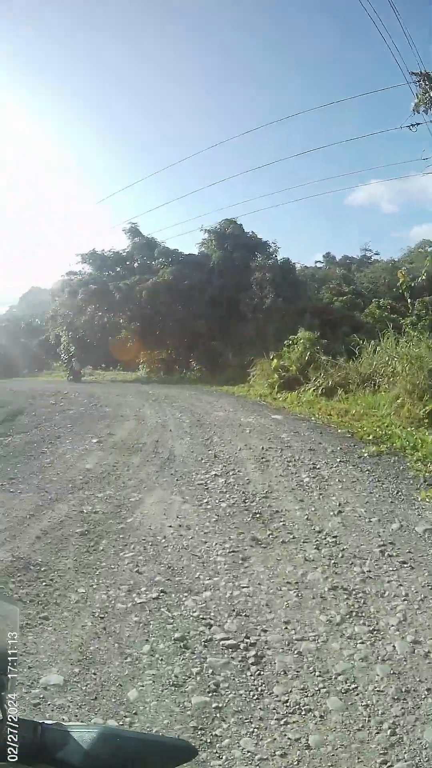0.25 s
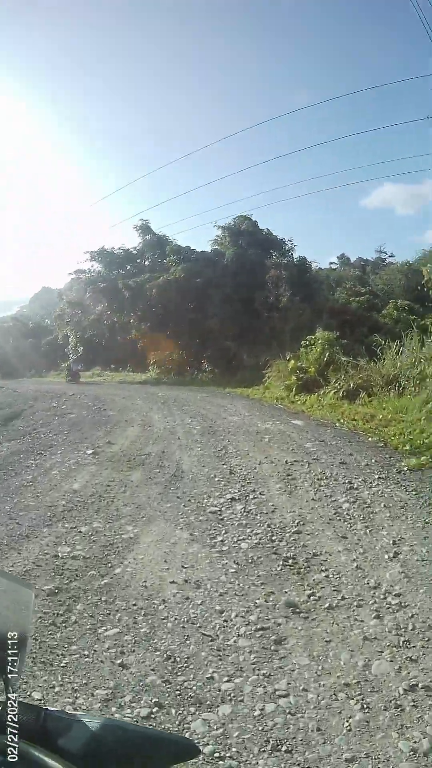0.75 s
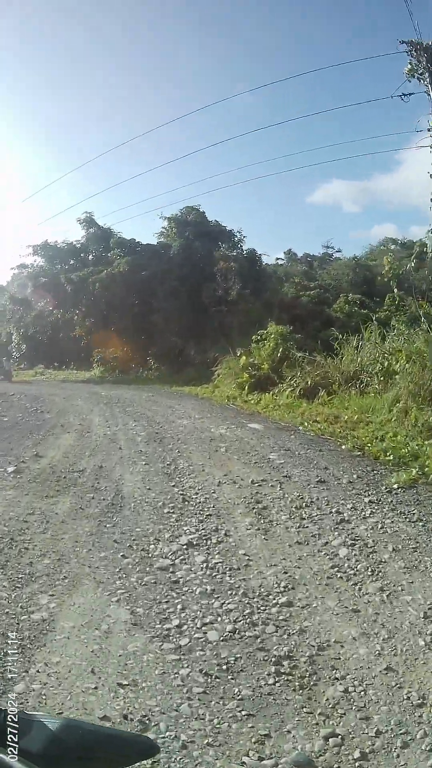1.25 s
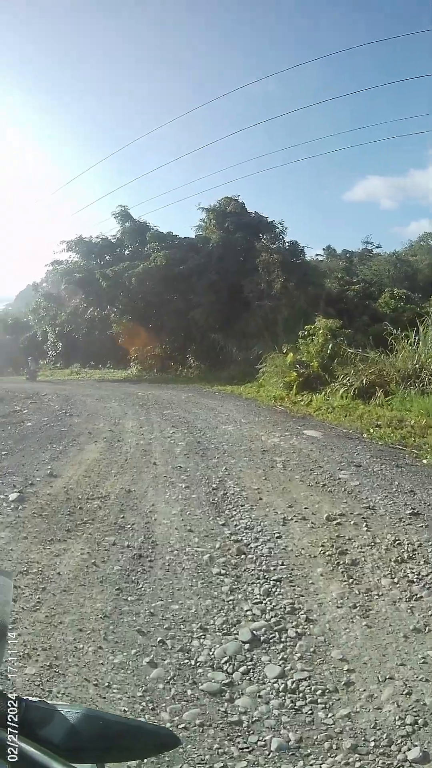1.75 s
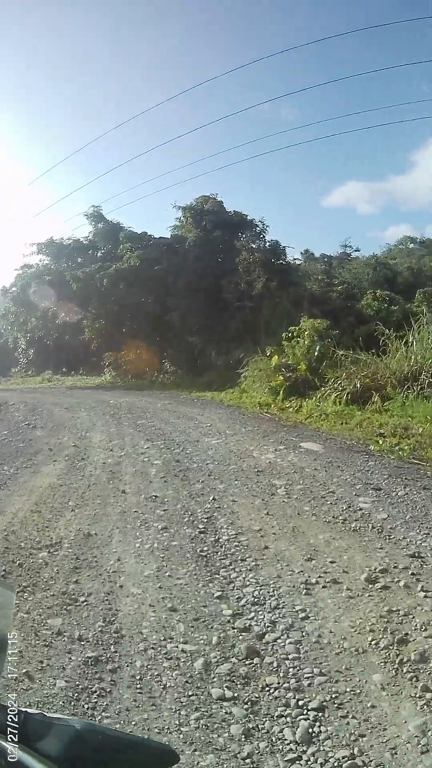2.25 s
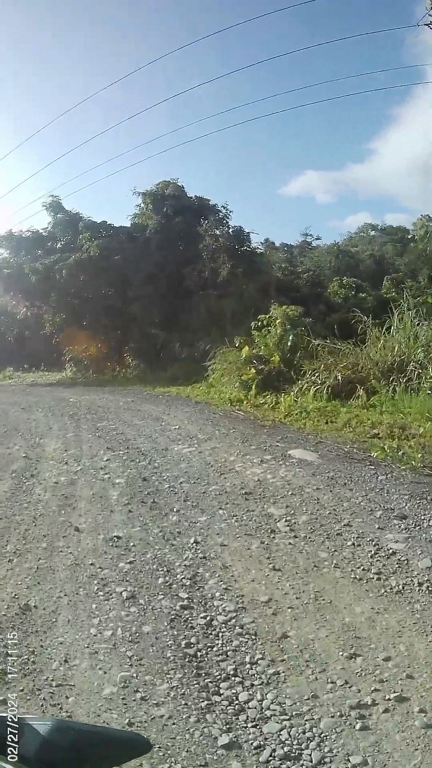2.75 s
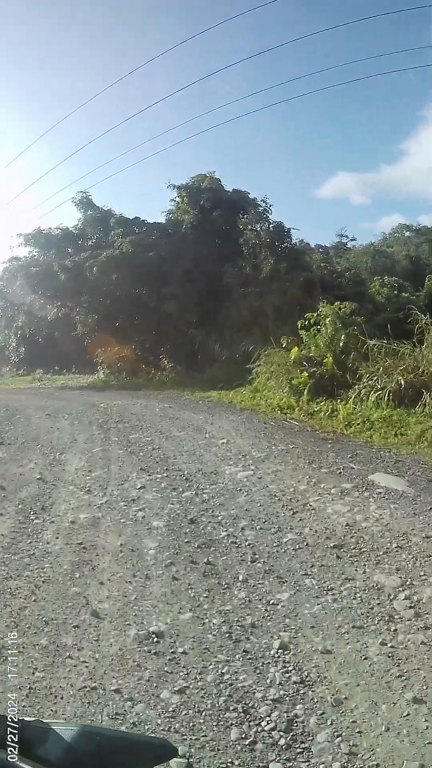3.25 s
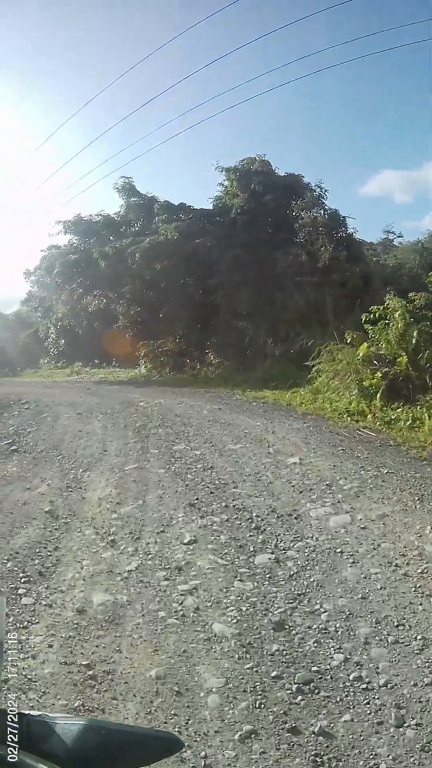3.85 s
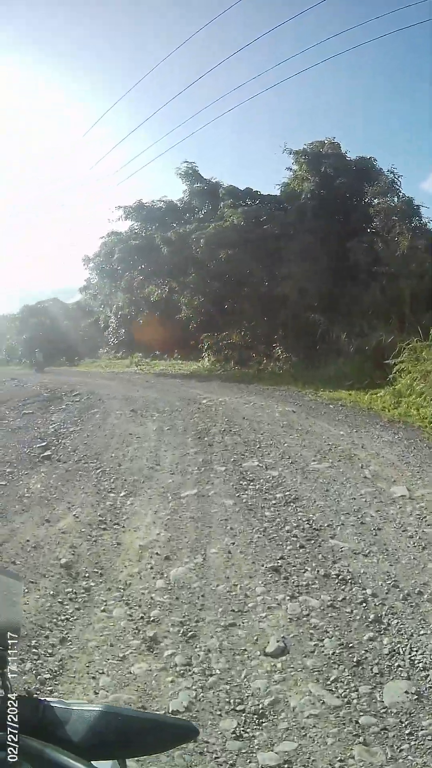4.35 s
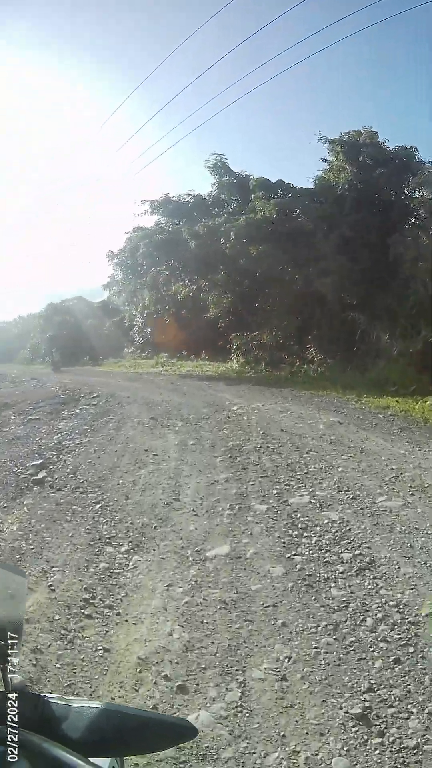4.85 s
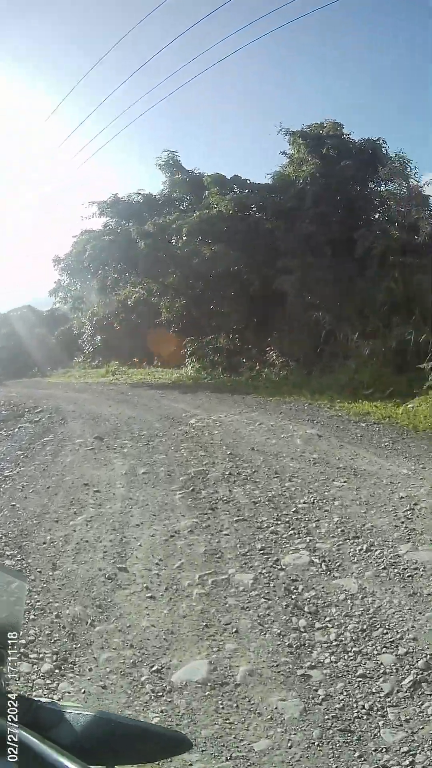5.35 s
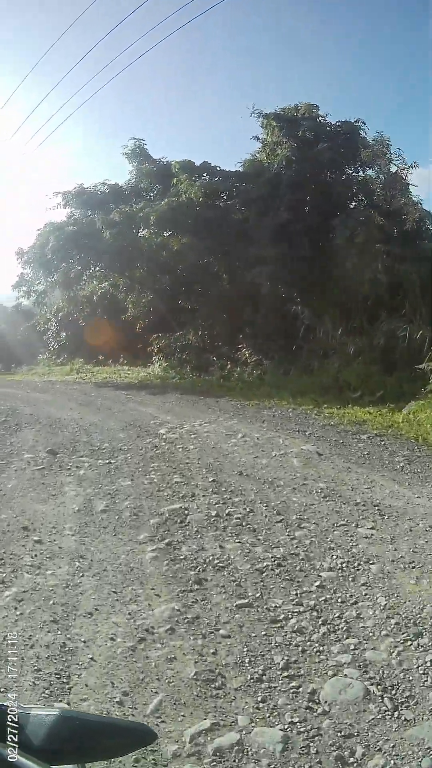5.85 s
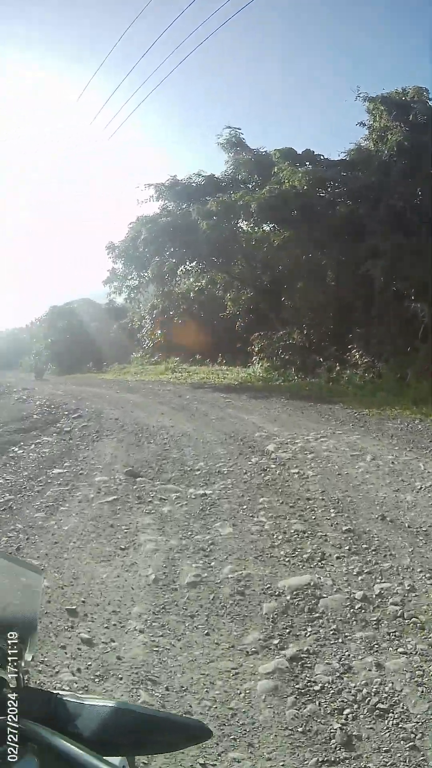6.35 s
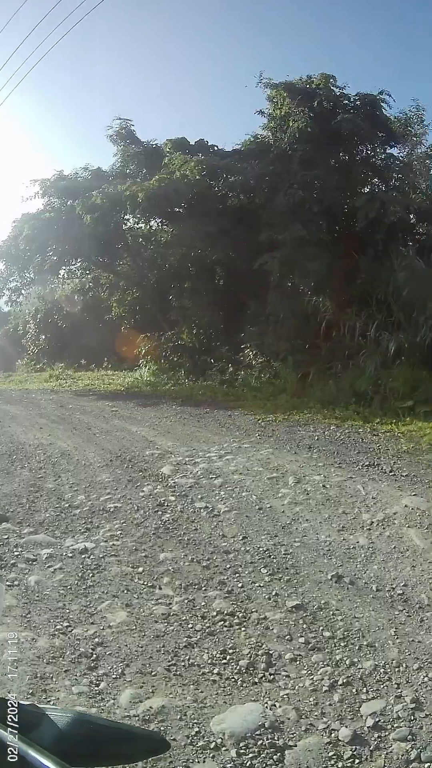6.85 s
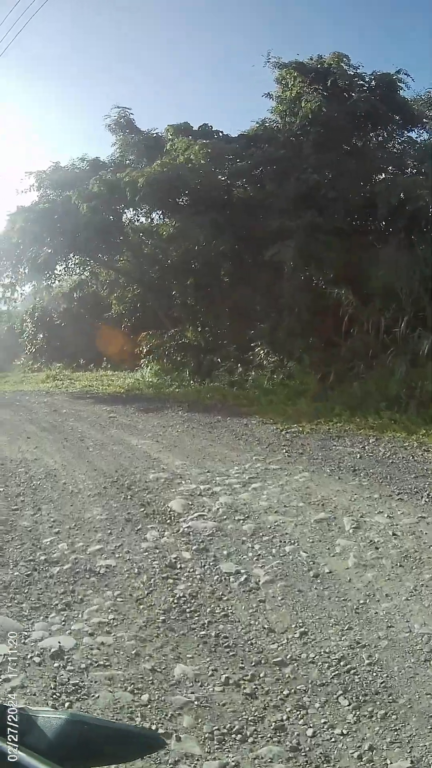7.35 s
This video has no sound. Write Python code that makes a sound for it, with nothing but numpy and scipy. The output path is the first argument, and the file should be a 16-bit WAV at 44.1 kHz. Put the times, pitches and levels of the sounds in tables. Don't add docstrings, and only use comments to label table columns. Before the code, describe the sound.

Continuous close motorcycle engine, deep and lumpy, lugging at a nearly steady low pace on loose stones outdoors. Its dry metallic rattle and valve chatter fill the midrange over tyre rumble. Stones knock dully on the frame, a loose plate clanks, a panel buzzes briefly near the start, and very faint high brake squeaks pass. The microphone is mounted on the bike, mono and dry, without audible surroundings.

```python
import sys
import numpy as np
from scipy import signal
from scipy.fft import rfft, irfft
from scipy.io import wavfile

SR = 44100
rng = np.random.default_rng(int(sys.argv[2]) if len(sys.argv) > 2 else 0)


def ratio_of_db(decibels):
    return 10 ** (np.asarray(decibels, float) / 20)


def int16_out(signal):
    q = np.round(np.clip(np.atleast_2d(signal).T, -1, 1) * 32767)
    wavfile.write(sys.argv[1], SR, q.astype(np.int16))


N = 336042

# time in seconds, cycle length in ms.
CYCLE_MS = [(0.0, 80.76), (0.18, 82.77), (0.54, 75.96), (1.22, 91.36), (1.42, 77.14), (1.66, 78.8),
            (2.22, 74.43), (3.26, 80.88), (3.82, 71.59), (4.14, 79.07), (4.7, 79.45), (4.86, 75.31),
            (5.94, 78.08), (6.26, 82.47), (6.98, 81.4), (7.14, 79.49), (7.3, 84.93), (7.62, 78.96)]
# start in seconds, front level in dB, rear level in dB.
FRONT_POOR = [(1.935, -29, -1.5), (2.242, -8.5, -1), (2.547, -32.5, -1.5), (3.014, -29.5, -2),
              (3.66, -8, -8.5), (3.81, -32, -6), (4.274, -30, -8), (4.436, -29, -5), (4.76, -30, -29.5),
              (4.916, -33, -33), (5.071, -28.5, -4.5), (5.225, -29.5, -4.5), (5.381, -4, -6),
              (6.176, -30, -6), (6.343, -29.5, -3.5), (6.925, -28.5, -5), (7.092, -30, -3.5)]
# start in seconds, front level in dB, rear level in dB, pop level in dB.
REAR_POOR = [
    (0.144, -0.5, -9.5, -6.5),
    (3.345, 1.1, -9, -10),
    (3.506, -0.2, -7, -21),
    (4.114, -1.5, -5, -12),
    (4.597, -2.4, -4.5, -11.5),
    (5.538, -1.1, -8.5, -9),
    (5.696, -5, -11, -6),
    (6.012, -8, -7.5, -12),
    (6.593, 0.5, -5, -7.5),
    (6.759, 0.5, -5.5, -9),
]
# start in seconds, front level in dB, rear level in dB.
SLOW_BURNS = [
    (0.23, -2, -5.5),
    (3.095, 1.3, -2),
    (3.261, 0.5, -4.5),
    (3.959, -0.5, -2),
    (5.853, -4, -6),
    (7.34, 1.5, -5.5),
]
# frequency in Hz, level in dB per Hz.
FRAME = [(230, -43), (390, -3.5), (520, -1), (615, -8), (700, -0.5), (900, -11), (1200, -16.5), (1420, -12),
         (1750, -25), (2500, -29.5), (3200, -37.5), (4000, -40.5), (5500, -45), (7000, -52.5),
         (11000, -67.5)]
# centre in Hz, width in Hz, height in dB above the frame's spectrum.
FRAME_PEAKS = [(535, 160, 3.87), (680.7, 45, 6.5), (1073, 59, 7.2), (1400, 87, 2), (2084, 250, 5.3),
               (2300, 93, -3), (2510, 88, 5.3), (2930, 250, 2.5), (3350, 180, -1.5), (3630, 130, 5.5),
               (3900, 180, -2.5), (4380, 400, 8), (5400, 250, 4)]
# start in seconds, peak level in dB, ring in Hz, upper ring in dB relative to the peak.
KNOCKS = [(1.207, -18.5, 706, -20), (1.474, -22, 716, -28.5), (1.577, -21, 546, -5), (1.684, -29, 690, -10),
          (3.489, -28, 670, -24), (3.719, -15.5, 648, -14), (3.793, -30, 700, -7), (3.892, -21.5, 700, -19),
          (3.941, -9.5, 706, -19), (4.115, -21.5, 712, -19), (4.297, -19.5, 485, -15),
          (4.54, -15.5, 780, -11.5), (5.004, -17, 715, -21), (5.089, -17.5, 690, -11),
          (5.182, -25, 669, -8), (5.211, -26.5, 580, -19), (5.255, -24, 493, -28), (5.349, -18, 503, -10),
          (5.603, -33, 753, 6), (5.762, -20.5, 542, -27), (6.182, -22, 740, -4), (6.242, -32, 703, -18),
          (6.409, -23.5, 740, -27), (6.648, -19.5, 677, -12), (6.681, -25, 523, -33),
          (6.906, -25, 635, -20), (6.939, -20, 667, -14), (7.326, -18, 535, -11.5), (7.451, -24, 583, -10),
          (7.572, -35, 600, -8)]
# start in seconds, peak level in dB, ring in Hz.
CLANKS = [(1.164, -27.5, 1290), (1.2882, -26, 1250), (2.3767, -31, 1255), (2.7734, -23, 1350),
          (2.993, -32.5, 1440), (3.2026, -26, 1250), (3.7232, -25, 1210), (3.9474, -27, 1287),
          (4.539, -18, 1410), (4.977, -25.5, 1270), (5.0876, -23.5, 1300), (5.352, -20, 1400),
          (6.1823, -23, 1455), (6.304, -26, 1400), (6.387, -24.5, 1385), (6.941, -23, 1250),
          (7.3134, -23, 1320), (7.4502, -20, 1400)]


def rms_one(x):
    return x / np.sqrt(np.mean(x ** 2) + 1e-20)


def clicks(times, sizes):
    train = np.full(N, 1e-18)
    np.add.at(train, np.clip(np.round(np.asarray(times) * SR).astype(int), 0, N - 1), sizes)
    return train


def ring(x, hz, t60):
    r, w = ratio_of_db(-60 / (t60 * SR)), 2 * np.pi * hz / SR
    return signal.lfilter([0, np.sin(w)], [1, -2 * r * np.cos(w), r * r], x)


def smooth(x, ms):
    r = np.exp(-1000 / (ms * SR))
    return signal.lfilter([1 - r], [1, -r], x)


def drift(rate_hz):
    ms = 1000 / (2 * np.pi * rate_hz)
    return rms_one(smooth(smooth(rng.standard_normal(N), ms), ms))


def bell(centre_s, width_s):
    return np.exp(-.5 * ((np.arange(N) / SR - centre_s) / width_s) ** 2)


def shaped_noise(times, size_db, swell_ms):
    swell = clicks(times, ratio_of_db(size_db))
    for _ in range(3):
        swell = smooth(swell, swell_ms)
    return swell * rng.standard_normal(N)


def band(x, low_hz, high_hz):
    return signal.sosfilt(signal.butter(2, [low_hz, high_hz], "band", fs=SR, output="sos"), x)


def colour(x, points, peaks=(), size=4096):
    hz = np.maximum(np.arange(size // 2 + 1) * SR / size, 1)
    points_hz, points_db = np.transpose(points)
    level_db = np.interp(np.log(hz), np.log(points_hz), points_db)
    for centre_hz, width_hz, peak_db in peaks:
        level_db = level_db + peak_db / (1 + (2 * (hz - centre_hz) / width_hz) ** 2)
    cepstrum = irfft(np.log(ratio_of_db(level_db)))
    cepstrum[1:size // 2] *= 2
    cepstrum[size // 2 + 1:] = 0
    return signal.fftconvolve(x, irfft(np.exp(rfft(cepstrum))))[:N]


def struck(s, peak_db, hz, t60, soft_ms):
    out, at, span = np.zeros(N), int(s * SR), np.arange(6000) / SR
    decay = ratio_of_db(peak_db - 60 * span / t60)
    onset = 1 - np.exp(-1000 * span / soft_ms)
    wave = decay * onset * np.sin(2 * np.pi * hz * span)
    out[at:at + len(span)] = wave[:N - at]
    return out


def cycles():
    poor = np.array([row[0] for row in FRONT_POOR + REAR_POOR + SLOW_BURNS])
    start, length = [-.0179], []
    while start[-1] < N / SR:
        slowed = np.min(np.abs(poor - start[-1])) < .03
        cycle_ms = np.interp(start[-1], *np.transpose(CYCLE_MS)) + 3.16 * slowed
        length.append(cycle_ms / 1000)
        start.append(start[-1] + length[-1])
    return np.array(start[:-1]), np.array(length)


def firings():
    # start in seconds, strength in dB, width in
    # ms.
    stray_pulses = [
        (0.0091, -4.0, 2.3),
        (0.3527, -13.5, 0.4),
        (1.2542, -11.7, 1.1),
        (3.5322, -10.9, 0.75),
        (4.7632, -10.3, 1.4),
        (4.7757, -10, 0.9),
        (4.782, -9, 0.9),
        (4.7882, -9, 0.9),
        (4.9313, -4.9, 1.8),
        (4.9524, -7.9, 1.4),
    ]
    # start in seconds, front level in dB, rear level in dB.
    soft_burns = [
        (0.0, 0.5, -0.5),
        (1.036, -2.5, 0.3),
        (1.302, -2, 0.1),
        (1.779, -2.5, 1),
        (2.393, -1.5, 0.5),
        (2.858, -3.5, 0.9),
        (4.996, 0, 1.5),
        (6.427, -1.5, -0.7),
        (6.51, -4, -1.3),
    ]
    front_s, length = cycles()
    rear_s = front_s + .243 * np.interp(front_s, *np.transpose(CYCLE_MS)) / 1000
    uneven_db = 0.5 * rng.standard_normal((len(length), 2))
    front_db = 0.56 - 0.17 * (1000 * length - 78) + uneven_db[:, 0]
    rear_db = 0.6 + uneven_db[:, 1]
    pop_ms = 0.93
    late = list(stray_pulses)
    for s, front, rear, *pop in FRONT_POOR + REAR_POOR + SLOW_BURNS:
        k = np.argmin(np.abs(front_s - s))
        front_db[k + 1] -= 0.9
        front_db[k], rear_db[k] = front, rear
        if pop:
            late.append((2 * rear_s[k] - front_s[k], pop[0], pop_ms))
        else:
            late.append((rear_s[k] + .0106, -16 + min(rear + 11, 0), .4))
    for s, front, rear in soft_burns:
        k = np.argmin(np.abs(front_s - s))
        front_db[k], rear_db[k] = front, rear
    front_ms = 0.85 + 0.5 * (front_db < -8)
    for s, *_ in SLOW_BURNS:
        k = np.argmin(np.abs(front_s - s))
        front_s[k], front_ms[k] = front_s[k] - .004, 2.2
        late.append((front_s[k] + .009, -10.0, pop_ms))
    rear_ms = np.clip(0.54 + 0.06 * rear_db, .4, 1)
    front_rows = np.c_[front_s, front_db, front_ms]
    other_rows = np.vstack([np.c_[rear_s, rear_db, rear_ms], late])
    return [rows[rows[:, 0] < N / SR] for rows in (front_rows, other_rows)]


def blasts(rows, size=0):
    s, strength_db, width_ms = np.transpose(rows)[:, :, None]
    at = np.round(s * SR).astype(int) + np.arange(-400, 401)
    from_centre = (at / SR - s) * 1000 / width_ms
    shape = ratio_of_db(strength_db) / width_ms * np.exp(-.5 * from_centre ** 2)
    lead = int(.3 * SR)
    out = np.zeros(N + 2 * lead)
    np.add.at(out, at + lead, shape)
    return out[lead - size:lead + N]


def exhaust():
    # start in seconds, strength in dB, width in ms.
    misfires = [
        (3.1291, -15.5, 0.4),
        (3.5466, -13.2, 1.1),
        (4.2747, -5.6, 2.3),
        (4.4366, -8.5, 1.8),
        (4.7997, -6.8, 2.3),
        (5.5484, -13.4, 0.75),
        (5.7067, -13.5, 0.75),
        (6.3759, -14.9, 0.4),
        (7.3731, -13.1, 0.4),
    ]
    # frequency in Hz, level in dB, t60 in seconds, sign.
    pipe_modes = [(73.1, -43.1, .231, -1), (131.1, -44.0, .064, 1), (165.0, -57.3, .117, 1),
                  (192.2, -48.5, .053, 1), (313.7, -47.5, .023, 1), (333.9, -48.7, .083, -1)]
    lead = int(.3 * SR / 2)
    front, rest = (blasts(rows, size=lead) for rows in firings())
    rest = rest - blasts(misfires, size=lead)
    pipe = 0
    for hz, level_db, t60, sign in pipe_modes:
        header_db = 6.5 * (hz > 300)
        pipe = pipe + sign * ratio_of_db(level_db) * ring(ratio_of_db(header_db) * front + rest, hz, t60)
    w, mic_q = 2 * np.pi * 39.3, .3
    return signal.lfilter(*signal.bilinear([1, 0, 0], [1, w / mic_q, w * w], SR), pipe)[lead:]


def rumble():
    # frequency in Hz, level in dB per Hz.
    road_spectrum = [(20, -17), (40, -17), (60, 1), (120, -9), (175, 11), (240, -19.5), (330, 2),
                     (420, -26.5), (600, -50.5), (1500, -110)]
    swell = rms_one(smooth(smooth(blasts(np.vstack(firings())), 9.5), 23.0))
    drone = rms_one(colour(rng.standard_normal(N), road_spectrum, size=16384))
    return ratio_of_db(-30.5) * (0.57 + 0.68 * swell) * drone


def at_share(share):
    start, length = cycles()
    return np.maximum(start + share * length, 0)


def valve_gear():
    # share of the cycle, low edge in Hz, high edge in Hz, level in dB over the whirr, swell in ms.
    puffs = [(.8, 1700, 3200, 8, 2.5), (.755, 1250, 1700, 7.5, 1.3), (0.071, 1700, 3000, 6.5, 3),
             (.12, 900, 1250, 10.5, 3.0), (.82, 900, 1100, 2.5, 6.7), (.33, 5200, 12000, 3, 1.9),
             (.575, 3000, 8800, 1, 2.4), (.84, 4400, 11000, 2.5, 3.0), (.035, 5000, 14000, 1.5, 2.5),
             (.43, 1250, 2250, 2.5, 2), (0.035, 1250, 1700, 4.5, 2.2), (.05, 2400, 4500, 1, 2.3),
             (1, 2250, 2900, 3, 0.83)]
    # share of the cycle, low edge in Hz, high edge in Hz, level in dB over the whirr.
    thumps = [(.03, 400, 620, 5.5), (.775, 420, 600, 5), (0.69, 600, 850, 5.5), (0.97, 600, 790, 2.2),
              (.345, 550, 850, 5), (0.014, 600, 850, 4), (.16, 600, 850, 3), (0.49, 600, 930, 3),
              (.78, 2350, 2600, 8.5), (.04, 2350, 2600, 11), (0.87, 2000, 2200, 6), (.04, 2000, 2200, 5)]
    out, uneven_db = 0, 1.5
    for share, low_hz, high_hz, db, swell_ms in puffs:
        s = at_share(share) - swell_ms / 500
        noise = shaped_noise(s, db + rng.normal(0, uneven_db, len(s)), swell_ms)
        out = out + band(swell_ms * SR / 270 * noise, low_hz, high_hz)
    for share, low_hz, high_hz, db in thumps:
        s = at_share(share)
        size = ratio_of_db(db + rng.normal(0, uneven_db, len(s))) * rng.choice([-1, 1], len(s))
        size = size * np.sqrt(SR / (high_hz - low_hz))
        out = out + band(clicks(s, size), low_hz, high_hz)
    return out


def gravel(per_s=260.0, spread_db=3.5, ring_cycles=28.0):
    sizes = ratio_of_db(spread_db * np.minimum(rng.exponential(1, N), 3)) * rng.choice([-1, 1], N)
    thrown = sizes * (rng.random(N) < per_s * ratio_of_db(3.0 * drift(8)) / SR)
    parts_hz, dealt = np.geomspace(480, 1600, 14), rng.integers(0, 14, N)
    out = 0
    for k, hz in enumerate(parts_hz):
        out = out + hz * ring(thrown * (dealt == k) + 1e-18, hz, ring_cycles / hz)
    return rms_one(out)


def rattle():
    # time in seconds, level in dB.
    rattle_level = [(0.0, -32.5), (0.21, -34), (0.75, -34.5), (1.2, -33), (1.66, -32.5), (1.97, -34),
                    (2.6, -34), (3.2, -33.5), (3.69, -33), (4.3, -33.5), (5.0, -33.5), (5.6, -33.5),
                    (6.2, -34), (6.8, -33.5), (7.2, -33.5), (7.62, -32.5)]
    sag_ms = 3.0
    sag = smooth(smooth(clicks(at_share(.62), 2.7 * sag_ms * SR / 1000), sag_ms), sag_ms)
    whirr = (1 - np.clip(0.31 * sag, 0, 1)) * ratio_of_db(1.7 * drift(24)) * rng.standard_normal(N)
    shaken = valve_gear() + ratio_of_db(-11.0) * gravel() + whirr
    level_db = np.interp(np.arange(N) / SR, *np.transpose(rattle_level))
    return ratio_of_db(level_db) * rms_one(colour(shaken, FRAME, FRAME_PEAKS))


def microphone_hiss():
    return ratio_of_db(-78) * rng.standard_normal(N)


def squeaks():
    # start in seconds, peak level in dB, pitch in Hz.
    brake = [
        (0.5347, -56.5, 12300),
        (3.4114, -56, 12500),
        (4.2872, -54, 12500),
        (5.2066, -59.5, 12500),
        (6.1225, -53.5, 12400),
        (0.107, -73, 11500),
        (3.8, -73, 11500),
    ]
    t, waver = np.arange(N) / SR, 2 * np.pi * np.cumsum(50.0 * drift(40)) / SR
    out = 0
    for s, db, hz in brake:
        swell = bell(s + .005, 0.0061) + .12 * bell(s + .03, .004)
        out = out + ratio_of_db(db) * swell * np.sin(2 * np.pi * hz * t + waver)
    return out


def small_stones():
    # start in seconds, peak level in dB, ring in Hz.
    pebbles = [(0.128, -19, 697), (0.294, -28.5, 700), (0.533, -31, 533), (1.283, -20, 697),
               (1.305, -20.5, 732), (1.651, -26.5, 713), (1.781, -21, 474), (1.841, -24, 705),
               (2.019, -26, 659), (2.913, -18, 713), (3.077, -18, 514), (3.142, -20.5, 665),
               (3.871, -19, 554), (4.049, -24.5, 654), (4.501, -29, 517), (4.748, -19.5, 689),
               (4.899, -18, 511), (5.132, -24, 692), (5.471, -25, 541), (5.741, -26.5, 522),
               (5.881, -28, 514), (6.077, -27, 525), (6.269, -28, 452), (6.825, -24, 697),
               (7.236, -26, 528), (7.384, -20, 700), (7.489, -23, 689)]
    # start in seconds, peak level in dB, ring in Hz.
    taps = [(0.2053, -34.5, 1290), (0.403, -29, 1330), (0.468, -28, 1435), (0.802, -35.5, 1320),
            (0.8738, -27.5, 1026), (1.096, -29.5, 1390), (1.6815, -34, 1090), (1.7056, -34, 1146),
            (2.711, -31.5, 996), (2.837, -30, 1060), (3.5934, -30.5, 1120), (4.129, -31, 1186),
            (4.2061, -29, 1074), (4.313, -27, 1180), (4.368, -29, 1090), (4.686, -28.5, 1080),
            (4.8483, -30, 1095), (4.8962, -31, 1280), (5.0349, -29, 1250), (5.1565, -30, 1100),
            (5.441, -30.5, 1366), (5.502, -27.5, 1050), (5.5516, -27, 1180), (5.626, -27.5, 1090),
            (5.7132, -26.5, 1326), (5.7889, -25.5, 1080), (6.5175, -31, 961), (6.653, -29, 1376),
            (6.8208, -33.5, 1290), (6.8526, -31, 1070), (7.0986, -25, 993), (7.1426, -28, 1400),
            (7.2877, -26.5, 1305), (7.402, -28, 1200)]
    # start in seconds, peak level in dB, ring in Hz.
    grit = [(0.2318, -57, 2800), (0.2772, -54, 2920), (0.4, -50, 2920), (0.7661, -50, 3030),
            (2.1489, -55, 2860), (2.4727, -41, 2800), (3.0758, -55, 2930), (3.1601, -49.5, 2870),
            (3.6605, -55, 3630), (4.0037, -52, 2890), (4.117, -44, 2870), (4.4372, -54, 2800),
            (5.5402, -50, 3150), (5.6988, -53, 2800), (5.8016, -55, 2980), (5.8545, -55, 3160),
            (6.2406, -47, 2860), (6.512, -50, 2870), (6.5749, -57, 2940), (6.6577, -57, 2970),
            (6.8243, -54, 2930), (6.9919, -52, 2890), (7.2609, -54, 2810), (7.3366, -50, 2850),
            (7.4888, -55, 2870), (7.5925, -48, 2800)]
    return (sum(struck(s, db + 0.5, hz, 0.035, .7) for s, db, hz in pebbles)
            + sum(struck(s, db + 1.5, hz, 0.038, 0.93) for s, db, hz in taps)
            + sum(struck(s, db - 0.5, hz, 0.013, .3) for s, db, hz in grit))


def ticks():
    # start in seconds, peak level in dB, crunch in dB relative to it.
    tick_events = [(0.47, -39.5, 6.5), (0.9154, -43.5, 4), (1.284, -53, 7), (1.516, -47, 7),
                   (1.997, -53, 2), (2.383, -45.5, 7), (2.551, -56, 7), (2.8605, -54.5, 2),
                   (2.943, -35, -0.5), (3.768, -41.5, 1), (3.8023, -45, -1), (3.9492, -32, 2.5),
                   (3.9683, -38, -3), (4.3107, -50, 12), (4.5386, -49, 10.5), (4.8467, -45.5, 3.5),
                   (4.9042, -37.5, 3.5), (5.3526, -35, 2.5), (5.37, -39.5, 7.5), (5.4274, -52, 8.5),
                   (6.185, -57.5, 13), (6.304, -55, 13), (6.4136, -40.5, 2), (6.4573, -49, -1),
                   (6.9413, -53, 4), (7.1406, -52.5, 9.5), (7.45, -54.5, 4.5), (7.5206, -45, 0)]
    # frequency in Hz, level in dB.
    tick_colour = [(600, -41), (1500, -1.5), (2500, -2), (3600, 8.5), (5500, -6.5), (7800, -11),
                   (10000, -22), (16000, -30.5)]
    # centre in Hz, width in Hz, height in dB above.
    case_peaks = [(3000, 300, -6.5), (3480, 360, 7), (4350, 150, -7), (5500, 900, 4), (6760, 500, -10),
                  (7850, 900, 7.5), (9300, 700, -9), (10400, 700, 6), (11500, 600, 7)]
    s, peak_db, crunch_db = np.transpose(tick_events)
    train = clicks(s, ratio_of_db(peak_db))
    scuff = ratio_of_db(2.5) * smooth(train, 1.6) * rng.standard_normal(N)
    crunch = band(shaped_noise(s - .001, peak_db + crunch_db, 1.2), 1000, 2700)
    return ratio_of_db(11.0) * colour(train + scuff, tick_colour, case_peaks) + ratio_of_db(48.5) * crunch


def buzzes():
    # centre in seconds, half length in seconds, pitch in Hz, level in dB.
    panels = [
        (0.904, 0.053, 994, -45.5),
        (1.081, 0.14, 960, -43),
        (1.24, 0.07, 700, -35.5),
        (7.295, 0.0071, 3550, -59),
        (7.283, 0.006, 3250, -61),
        (4.325, 0.008, 6200, -72),
    ]
    noise, out = rng.standard_normal(N), 0
    for s, half_s, hz, db in panels:
        t60 = .059 * (1000 / hz) ** 1.3
        out = out + ratio_of_db(db) * bell(s, half_s) * rms_one(ring(ring(noise, hz, t60), hz, t60))
    return out


def clanks():
    # pitch ratio, level in dB relative.
    plate_sides = [(.84, -8.5), (1.17, -15.5), (1.8, -23)]
    out = 0
    for s, db, hz in CLANKS:
        for ratio, side_db in [(0.98, 0.01)] + plate_sides:
            out = out + struck(s, db + 7.5 + side_db, ratio * hz, 0.022, 1.6)
    return out


def knocks():
    # pitch ratio, level in dB relative, lag in seconds.
    knock_sides = [(.72, -9, 0.00035), (1.23, -9, .002), (.97, -10, 0.00794)]
    out, contact_ms = 0, 0.6
    for s, db, hz, upper_db in KNOCKS:
        t60 = 0.045 - 0.0021 * (db + 26)
        out = out + struck(s, db + 0.48, hz, t60, contact_ms)
        out = out + struck(s, db + upper_db, 1400, 0.21 * t60, 0.36)
        for ratio, side_db, lag_s in knock_sides:
            out = out + struck(s + lag_s, db + side_db, ratio * hz, t60, contact_ms)
    return out


def cracks():
    stones = [(s, db - 12) for s, db, *_ in KNOCKS]
    plate = [(s, db - 8) for s, db, _ in CLANKS]
    s, db = np.transpose(stones + plate)
    bright = np.array(FRAME, float)
    bright[:, 1] += 3.7 * np.log2(bright[:, 0] / 700)
    return ratio_of_db(29.5) * colour(shaped_noise(s, db, 1.2), bright, FRAME_PEAKS)


def scene():
    engine_and_road = ratio_of_db(-0.02) * exhaust() + rumble() + rattle()
    impacts = small_stones() + ticks() + clanks() + knocks() + cracks()
    mix = engine_and_road + impacts + buzzes() + squeaks() + microphone_hiss()
    return mix[None, :]


def roll_off(x):
    return signal.sosfilt(signal.butter(12, 15750, fs=SR, output="sos"), x)


def record(dry):
    return roll_off(dry)


dry = scene()
out = record(dry)
int16_out(out)
```